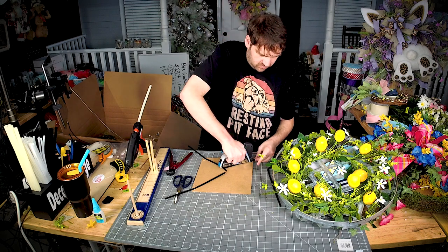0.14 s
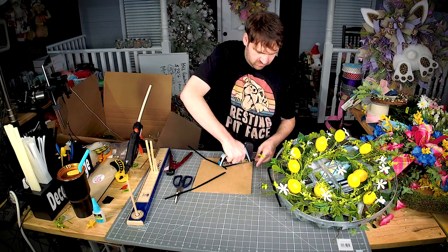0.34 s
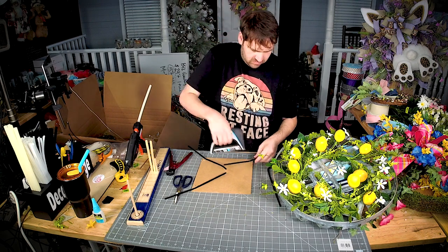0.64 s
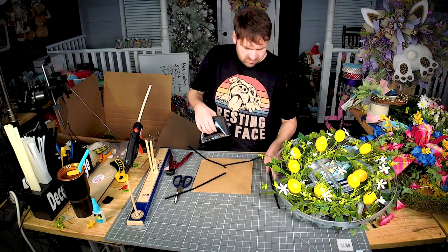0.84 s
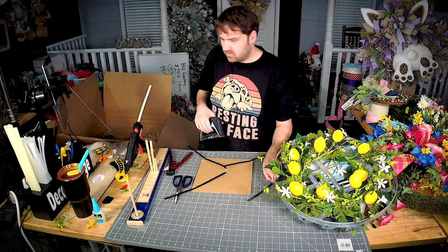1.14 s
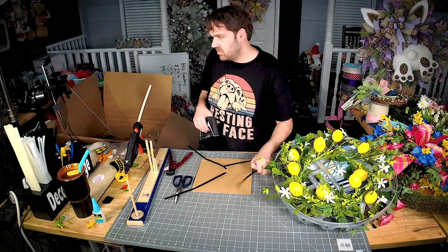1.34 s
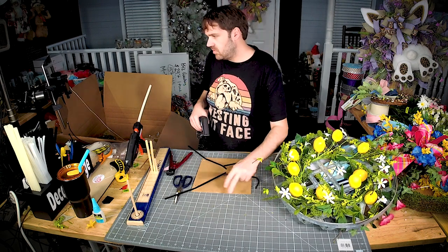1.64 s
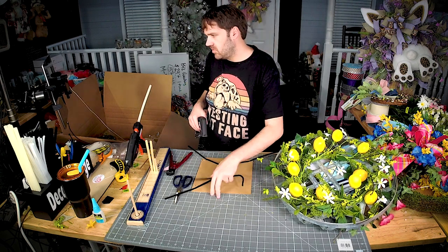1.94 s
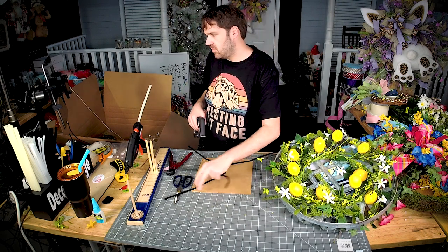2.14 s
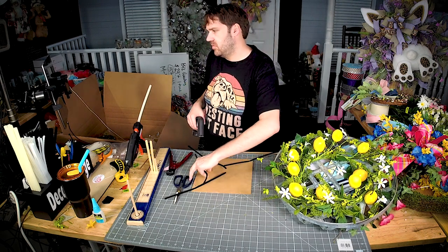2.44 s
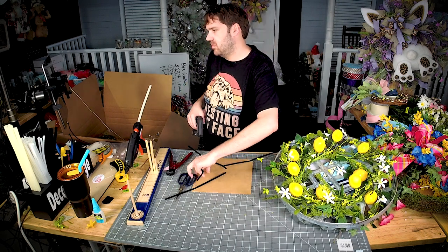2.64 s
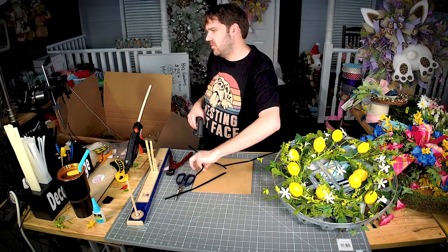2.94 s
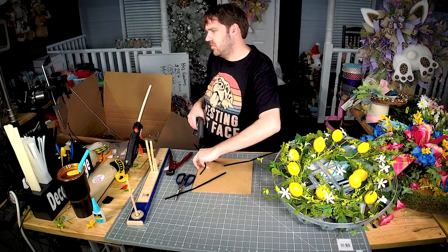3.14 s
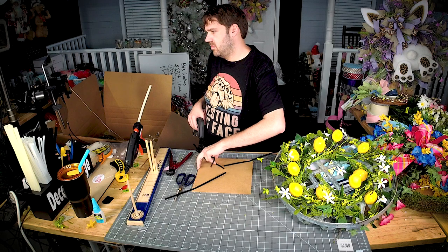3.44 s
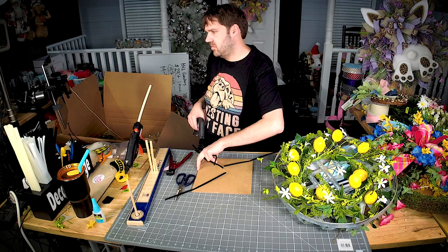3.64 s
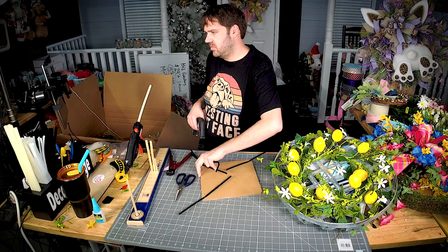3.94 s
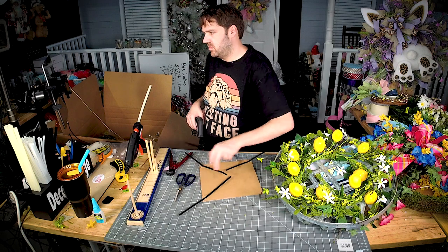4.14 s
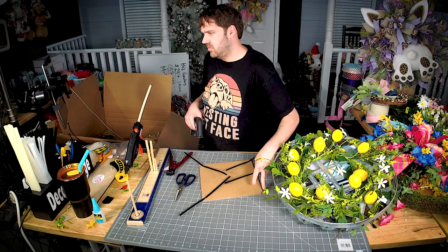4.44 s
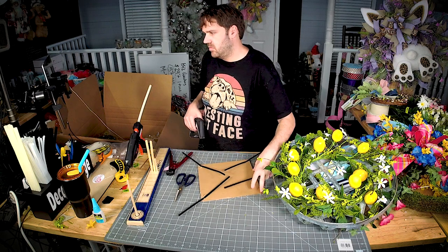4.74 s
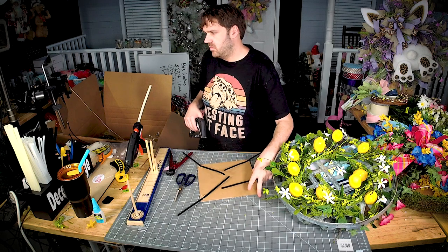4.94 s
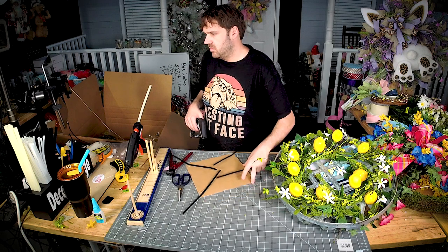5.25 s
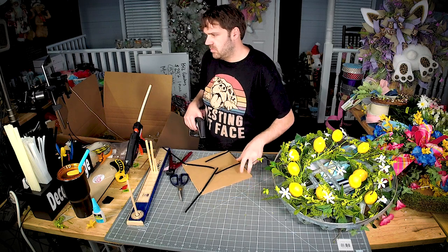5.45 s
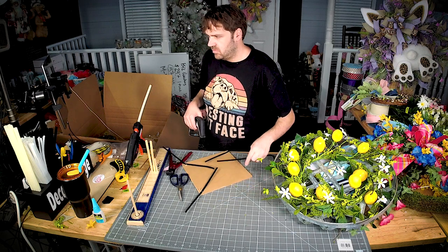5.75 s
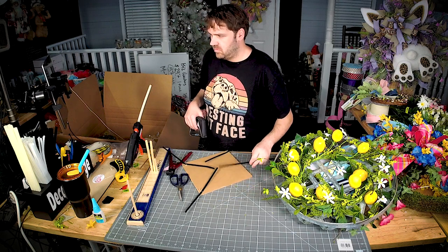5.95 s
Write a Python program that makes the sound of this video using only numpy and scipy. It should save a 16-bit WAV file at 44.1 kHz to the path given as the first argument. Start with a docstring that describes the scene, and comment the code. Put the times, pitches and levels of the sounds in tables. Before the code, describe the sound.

Close at a workbench in a small, fairly dry room, an air-driven staple gun ticks and slams once, with a short woody thud and a bright puff of air that fades. The trigger clicks back. Then much quieter: faint brushes, a cluster of light taps, and two papery slides of cardboard on a mat, the second with a small knock. Low room rumble and faint hiss lie beneath.

```python
"""On a workbench an air-driven staple gun fires once into cardboard: valve ticks, the driver's blow, escaping air,
then the trigger clicking back. Noise bursts and soft pushes excite resonances of steel and bench; the air is
shaped noise. A hand taps, slides and rustles cardboard and ties on the mat: rung clicks and friction grains.
Shaped noise makes the low rumble and faint hiss of the place, pulsed narrow noise a far insect."""
import sys
import numpy as np
from scipy import signal
from scipy.fft import rfft, irfft
from scipy.io import wavfile

SR = 44100
rng = np.random.default_rng(int(sys.argv[2]) if len(sys.argv) > 2 else 0)


def store_pcm(level_fs):
    """Save levels as 16-bit WAV."""
    pcm = np.round(np.clip(level_fs, -1, 1) * 32767).astype(np.int16)
    wavfile.write(sys.argv[1], SR, np.atleast_2d(pcm).T)


def gain_from_db(level_db):
    """Turn a decibel level (scalar or array-like) into a linear amplitude factor."""
    decades = np.asarray(level_db, float) / 20
    return 10 ** decades


N = 269230   # length [samples]


def rms_one(x):
    """Scale to rms 1."""
    return x / np.sqrt(np.mean(x ** 2) + 1e-20)


def peak_one(x):
    """Scale to a peak of 1."""
    return x / abs(x).max()


def add(out, start_s, x):
    """Mix x into out from a start time."""
    i = round(start_s * SR)
    out[i:i + len(x)] += x[:N - i]


def in_time(rows, column, outside):
    """Draw one column of a time curve at every sample, with a fixed value outside it."""
    rows = np.array(rows)
    return np.interp(np.arange(N) / SR, rows[:, 0], rows[:, column], outside, outside)


def swells(rows, column, rise_db_per_s, fall_db_per_s):
    """Gain of gestures that rise up to their start, hold and fall; their powers add."""
    t = np.arange(N) / SR
    power = 0
    for row in rows:
        start, hold = row[:2]
        rise = rise_db_per_s * np.maximum(start - t, 0)
        fall = fall_db_per_s * np.maximum(t - start - hold, 0)
        power = power + gain_from_db(row[column] - rise - fall) ** 2
    return np.sqrt(power)


def drift(rate_hz):
    """Slow random wander of rms 1: white noise through two equal low-pass poles."""
    r = np.exp(-2 * np.pi * rate_hz / SR)
    wander = signal.lfilter([1], [1, -2 * r, r * r], rng.standard_normal(N + SR))
    return rms_one(wander[SR:])   # the first second lets the filter settle


def coloured(points, source):
    """Shape a signal by a spectrum in dB per Hz, drawn over log frequency; rms 1."""
    hz, db = np.transpose(points)
    grid = np.maximum(np.arange(N // 2 + 1) * SR / N, 1)
    gain = gain_from_db(np.interp(np.log(grid), np.log(hz), db))
    return rms_one(irfft(rfft(source) * gain, N))


def ring(x, hz, t60):
    """Decaying mode: a unit click sets a sine of height 1 ringing."""
    r, w = gain_from_db(-60 / (t60 * SR)), 2 * np.pi * hz / SR
    return signal.lfilter([0, np.sin(w)], [1, -2 * r * np.cos(w), r * r], x + 1e-18)


def resonance(x, hz, width):
    """Two-pole band-pass with gain 1 on top."""
    r = np.exp(-np.pi * width / SR)
    poles = [1, -2 * r * np.cos(2 * np.pi * hz / SR), r * r]
    return signal.lfilter([(1 - r * r) / 2, 0, (r * r - 1) / 2], poles, x)


def burst(t60, rise):
    """A quarter second of noise that rises quickly and dies away."""
    t = np.arange(SR // 4) / SR
    return rng.standard_normal(len(t)) * (1 - np.exp(-t / rise)) * gain_from_db(-60 * t / t60)


def grains(per_s, spread_db, clump_db):
    """Dense random clicks of uneven size that come in clumps."""
    sizes = gain_from_db(spread_db * np.minimum(rng.exponential(1, N), 3)) * rng.choice([-1, 1], N)
    chance = per_s * gain_from_db(clump_db * drift(40)) / SR
    return sizes * (rng.random(N) < chance)


# spectrum of rumble and hiss: (frequency [Hz], density [dB per Hz])
ROOM_TONE_COLOUR = [(18, -32), (30, -3.5), (49, -3), (71, -2.5), (104, 1), (124, -3.5), (145, -12),
                    (319, -20.5), (432, -26.5), (529, -24), (571, -31.5), (4140, -44.5), (7630, -54.5),
                    (10300, -47.5), (12500, -52), (13200, -68)]
# small variation of the low rumble: (time [s], level [dB])
RUMBLE_LEVEL = [(0, 1), (2, 0), (3, 2.5), (3.7, 0), (6.1, 0)]
# faint narrow whines that flicker: (start [s], end [s], frequency [Hz], width [Hz], level [dB])
WHINES = [(0.98, 1.03, 1760, 150, -69.5), (3.83, 3.92, 8240, 150, -81), (5.06, 5.103, 2800, 150, -67.5),
          (5.45, 5.95, 1910, 150, -83), (5.45, 5.949, 3980, 200, -86)]
ROOM_TONE_DB = -52   # rms before the rumble is varied


def room_tone():
    """Shaped noise: low rumble whose level varies a little, under steady hiss, with whines of narrow noise."""
    tone = gain_from_db(ROOM_TONE_DB) * coloured(ROOM_TONE_COLOUR, rng.standard_normal(N))
    rumble = signal.sosfiltfilt(signal.butter(2, 250, fs=SR, output="sos"), tone)
    tone += rumble * (gain_from_db(in_time(RUMBLE_LEVEL, 1, 0)) - 1)
    for start, end, hz, width, db in WHINES:
        fade = np.interp(np.arange(N) / SR, [start - 0.015, start, end, end + 0.02], [0, 1, 1, 0])
        flicker = gain_from_db(db + 1.6 * drift(6.3))
        narrow = resonance(resonance(rng.standard_normal(N), hz, width), hz, width)
        tone += fade * flicker * rms_one(narrow)
    return tone


# far chirring, a single row: (frequency [Hz], width [Hz], pulse rate [per s], level [dB])
INSECT = 10252.5, 901, 31.5, -88.5


def insect():
    """Short puffs of narrow treble noise at a steady, slightly wandering rate."""
    hz, width, per_s, db = INSECT
    phase = np.pi * per_s * np.arange(N) / SR + 0.28 * drift(1.475)
    puffs = np.sin(phase) ** 8 * gain_from_db(2.7 * drift(2.7))   # one puff per half turn
    chirr = resonance(resonance(puffs * rng.standard_normal(N), hz, width), hz, width)
    return gain_from_db(db) * rms_one(chirr)


# spectra of the two friction layers: (frequency [Hz], density [dB per Hz])
RUSTLE_BODY = [(180, -15), (330, 2), (520, -2.5), (670, 4.5), (800, -2), (1050, 1), (1700, -4.5),
               (3500, -10.5), (5000, -20), (8000, -35.5)]
RUSTLE_TREBLE = [(2500, -24), (4500, -7.5), (6800, -1), (8300, -2), (11000, -8), (13000, -12), (15500, -16)]
# short brushes of hand and ties on the mat: (hold start [s], hold [s], body level [dB], treble level [dB])
BRUSHES = [(.09, 0.015, -72.5, -85.5), (.86, 0.029, -71, -78.5), (1.0, 0.052, -69.5, -74.5),
           (1.055, .045, -70, -76), (1.125, .02, -65, -78), (1.19, 0.071, -78, -77.5),
           (1.44, 0.036, -76, -77), (2.01, .03, -81, -82), (2.48, 0.044, -65, -87), (2.55, 0.016, -58, -70),
           (2.625, 0.032, -60, -71.5), (2.75, 0.038, -58, -81), (2.84, 0.025, -63.5, -75),
           (3.13, .02, -93, -78), (3.61, 0.029, -74.5, -78.5), (4.58, .01, -75, -79),
           (4.71, 0.064, -68, -77), (5.71, .01, -81, -85), (5.81, .01, -78, -80)]
# two long slides of the cardboard, each pressed in two swells: (time [s], body level [dB], treble level [dB])
SLIDES = [
    [(3.7, -86, -88), (3.76, -62.5, -73), (3.8, -56.5, -64.5), (3.845, -53, -66), (3.89, -59.5, -68.5),
     (3.95, -53.5, -67), (4.0, -55.5, -70.5), (4.05, -74, -83), (4.12, -88, -90)],
    [(4.9, -79, -86), (4.98, -68, -78), (5.04, -57.5, -67.5), (5.1, -51, -67), (5.22, -51, -65),
     (5.28, -47.5, -61), (5.33, -58, -62), (5.38, -56.5, -65), (5.43, -55.5, -69), (5.48, -96, -80)],
]
BRUSH_RISE_DB_PER_S, BRUSH_FALL_DB_PER_S = 253, 250


def rustle():
    """Friction grains, sparser in the body and denser in the treble, follow the brushes and slides."""
    body = coloured(RUSTLE_BODY, grains(5000, 2.9, 2.5))
    treble = coloured(RUSTLE_TREBLE, grains(12000, 2.5, 3.0))
    out = np.zeros(N)
    for k, layer in enumerate([body, treble]):
        gain = swells(BRUSHES, k + 2, BRUSH_RISE_DB_PER_S, BRUSH_FALL_DB_PER_S)
        for slide in SLIDES:
            gain = gain + gain_from_db(in_time(slide, k + 1, -130))
        out += layer * gain
    return out


# modes of bench and cardboard: (frequency [Hz], gain [dB], t60 [s])
BENCH_MODES = [(295, -14, 0.082), (348.5, -19, 0.14), (404, -14, 0.06), (508, -14.5, 0.074),
               (654, -12, 0.068), (1040.3, -19.5, 0.029), (1130.5, -21.5, 0.081), (1250, -10, 0.04),
               (1440, -22.5, .04), (1610, -19, 0.016)]


def bench(push):
    """A push sets the modes of the bench ringing, with alternating signs."""
    return sum((-1) ** k * gain_from_db(db) * ring(push, hz, t60) for k, (hz, db, t60) in enumerate(BENCH_MODES))


# taps of hand, ties and cardboard, crack and scuff against the knock's peak:
# (time [s], knock peak [dB], ring [Hz], crack [dB], scuff [dB])
TAPS = [(0.093, -58.5, 423, -16, 7), (.885, -55.5, 1070, -22, 1), (1.405, -55.5, 3015, -3, -10),
        (2.003, -50.5, 1390, -2.5, -6), (2.459, -43, 1710, -25, -12), (2.505, -45, 1500, -23, -9),
        (2.518, -45, 1610, -22, -12), (2.541, -24, 2660, -12, -6.5), (2.558, -39, 2150, -13, 2.5),
        (2.62, -48.5, 1500, -20, -6), (2.628, -42, 1370, -18, -7.5), (2.634, -43, 1430, -19, -9.5),
        (2.7758, -31.5, 1780, -20, -9), (2.795, -42, 2160, -24, -23), (2.8379, -29.5, 1550, -13, -5.5),
        (2.871, -47, 1123, -20, -10), (5.111, -39.5, 3200, -22, -6.5), (5.3973, -28, 2820, -24, -17),
        (5.412, -41, 2100, -8, -4), (5.421, -48, 2000, -17, -7)]
# small things that ring on after a tap: (time [s], frequency [Hz], level [dB], t60 [s])
PINGS = [(2.003, 4740, -57.5, 0.049), (5.397, 852, -37.5, 0.066), (5.397, 1970, -40.5, 0.073),
         (5.412, 1987, -47, 0.083)]
SCUFF_T60_S = 0.045


def taps():
    """A click rung at the pitch of the thing touched, a thin crack, a short scuff and a push into the bench."""
    out, push, click = np.zeros(N), np.zeros(N), signal.unit_impulse(SR // 4)
    thin = signal.butter(3, [2500, 10000], "band", fs=SR, output="sos")
    for s, db, hz, crack_db, scuff_db in TAPS:
        soft = signal.butter(6, 1.35 * hz, fs=SR, output="sos")   # a soft contact has no top
        knock = peak_one(signal.sosfilt(soft, resonance(click, hz, 0.65 * hz)))
        noise = burst(SCUFF_T60_S, rise=0.00042)
        dull = signal.butter(3, [0.39 * hz, 1.9 * hz], "band", fs=SR, output="sos")   # around the knock's pitch
        scuff = peak_one(signal.sosfilt(dull, noise))
        thin_scuff = peak_one(signal.sosfilt(thin, noise))
        crack = peak_one(signal.sosfilt(thin, click)) + gain_from_db(scuff_db + 3.5) * thin_scuff
        add(out, s, gain_from_db(db) * (knock + gain_from_db(scuff_db) * scuff + gain_from_db(crack_db) * crack))
        add(push, s, gain_from_db(db - 11.5) * click)
    for s, hz, db, t60 in PINGS:
        add(out, s, gain_from_db(db) * ring(click, hz, t60))
    soft_push = signal.lfilter([0.1], [1, -0.9], push)   # the mat passes only a soft push
    return out + bench(soft_push)


# escaping air: (time [s], level [dB])
AIR_LEVEL = [(.226, -73), (.229, -34), (.244, -38.5), (.256, -27.5), (.29, -34), (.34, -39.5), (.43, -40.5),
             (.485, -48.5), (.55, -51), (.85, -87.5)]
# spectrum of the jet: (frequency [Hz], density [dB per Hz])
AIR_COLOUR = [(290, -37.5), (500, -10), (758, -12), (1170, -7), (1510, -9), (3680, -1), (5430, -6),
              (8600, -3.5), (15500, -17)]


def air():
    """The exhaust jet: smooth bright noise whose level wanders slightly."""
    level_db = in_time(AIR_LEVEL, 1, -130) + 0.83 * drift(40)
    return gain_from_db(level_db) * coloured(AIR_COLOUR, rng.standard_normal(N))


# two valve ticks, the driver's blow and its bounces:
# (time [s], clatter [dB], push into the bench [dB], ring of the part struck [Hz], ring level [dB])
SHOT = [(0.2274, -8, -26.5, 3500, -21), (0.2367, -9, -28.5, 3295, -18.5), (0.2458, 5.5, -2.5, 1250, -7),
        (0.251, 2.5, -9.5, 1197, -6), (0.2553, -5.5, -15, 1730, -11), (0.261, -17, -21.5, 925, -17.5),
        (0.27, -11, -13, 4027, -22)]
# the trigger clicks back: (time [s], clatter [dB], ring of the part struck [Hz], ring level [dB])
TRIGGER = [(.489, -26, 3200, -29), (0.4939, -27.5, 3200, -33.5), (0.511, -20, 1155, -33.5),
           (0.5267, -40, 13340, -26.5), (0.5275, -33, 9050, -23), (0.5277, -34, 3130, -23.5),
           (.532, -28, 3250, -35.5)]
# resonances of the gun's steel parts: (frequency [Hz], width [Hz], gain [dB])
STEEL = [(2641, 580, 1), (3500, 600, 3), (4280, 300, 2.5), (5760, 600, -1.5), (7202, 800, -1.5),
         (8700, 1100, -2.5), (11100, 1500, -8.5), (15000, 920, -10)]
# resonances of the gun's loose parts: (frequency [Hz], width [Hz], relative gain [dB])
RATTLE = [(1500, 1100, -7), (2800, 140, -0.5), (3670, 200, -3)]
# they chatter as the trigger returns and as the gun is lifted: (hold start [s], hold [s], level [dB])
CHATTER = [(.49, 0.023, -49.5), (.513, 0.014, -46), (1.05, 0.044, -60.5), (1.06, 0.017, -57)]
CHATTER_RISE_DB_PER_S, CHATTER_FALL_DB_PER_S = 2000, 1500
SHOT_T60_S, TRIGGER_T60_S, TRIGGER_PUSH_DB = 0.018, 0.0073, -45.5
THUD_HZ, THUD_DB, THUD_T60_S, THUD_PUSH_S = 106, -11.5, 0.19, 0.011   # the whole table top gives way slowly


def gun():
    """Each blow rattles the steel briefly, rings the part struck and pushes the bench with a soft pulse."""
    clatter, part, push = np.zeros((3, N))
    blows = [(*row, SHOT_T60_S) for row in SHOT]
    blows += [(s, db, TRIGGER_PUSH_DB, hz, ring_db, TRIGGER_T60_S) for s, db, hz, ring_db in TRIGGER]
    for s, db, push_db, hz, ring_db, t60 in blows:
        add(clatter, s, gain_from_db(db) * burst(t60, rise=0.001))
        width = 0.35 * hz   # damped by the hand
        struck = resonance(resonance(burst(t60, rise=0.00032), hz, width), hz, width)
        add(part, s, gain_from_db(ring_db) * peak_one(struck))
        add(push, s, gain_from_db(push_db) * np.hanning(13) / 6)   # a pulse of unit area, scaled
    steel = sum((-1) ** k * gain_from_db(db) * resonance(clatter, hz, width) for k, (hz, width, db) in enumerate(STEEL))
    slow = np.hanning(round(THUD_PUSH_S * SR))
    slow_push = np.convolve(push, slow / slow.sum())[:N]
    thud = gain_from_db(THUD_DB) * ring(slow_push, THUD_HZ, THUD_T60_S)
    rattle = sum(gain_from_db(db) * resonance(grains(1500, 3.8, 2.3), hz, width) for hz, width, db in RATTLE)
    shake = swells(CHATTER, 2, CHATTER_RISE_DB_PER_S, CHATTER_FALL_DB_PER_S)
    return steel + part + bench(push) + thud + shake * rms_one(rattle)


ROOM_T60_S, ROOM_DB, WALL_CUT_HZ = 0.24, -20.5, 2300


def room(x):
    """Diffuse reflections: a dull noise tail that starts after a few ms."""
    t = np.arange(SR // 2) / SR
    tail = rng.standard_normal(len(t)) * gain_from_db(-60 * t / ROOM_T60_S) * (t > 0.004)
    tail = signal.sosfilt(signal.butter(1, WALL_CUT_HZ, fs=SR, output="sos"), tail)
    tail = tail / np.sqrt(np.sum(tail ** 2))   # unit energy
    return gain_from_db(ROOM_DB) * signal.fftconvolve(x, tail)[:N]


def scene():
    """Gun and hand sound in the room, over its tone; small things radiate no deep bass."""
    near = rustle() + taps() + air() + gun()
    near = signal.sosfilt(signal.butter(3, 75, "high", fs=SR, output="sos"), near)
    return (near + room(near) + room_tone() + insect())[None]


def low_pass(x):
    """Removes everything above the highest recorded frequency."""
    return signal.sosfilt(signal.butter(12, 15940, fs=SR, output="sos"), x)


MIC_PEAK_HZ, MIC_PEAK_WIDTH_HZ, MIC_PEAK_DB = 8400, 340, -7   # capsule resonance, added to everything the microphone picks up
TOP_HZ = 15950   # the low-pass is 75 dB down from here on


def record(dry):
    """The microphone drops the deepest bass and has a treble peak; high peaks are rounded and the top is cut."""
    mic = signal.sosfilt(signal.butter(4, 36, "high", fs=SR, output="sos"), dry)
    mic = mic + gain_from_db(MIC_PEAK_DB) * resonance(mic, MIC_PEAK_HZ, MIC_PEAK_WIDTH_HZ)
    rounded = 1.2 * np.tanh(mic / 1.2)
    mix = signal.sosfilt(signal.cheby2(22, 75, TOP_HZ, fs=SR, output="sos"), rounded)
    return low_pass(mix)


dry = scene()
out = record(dry)
store_pcm(out)
```